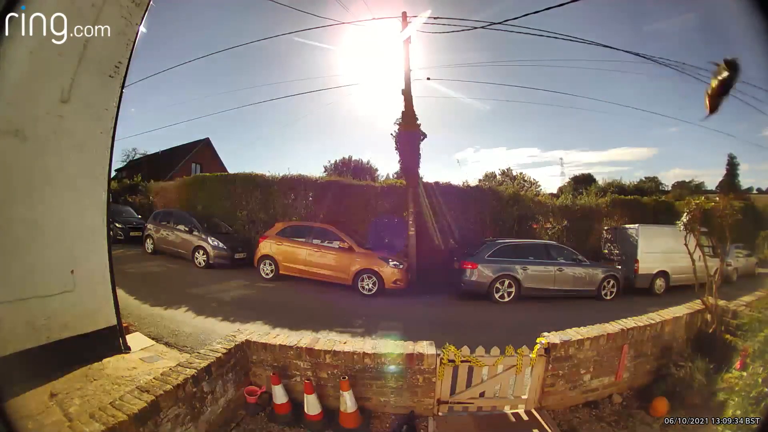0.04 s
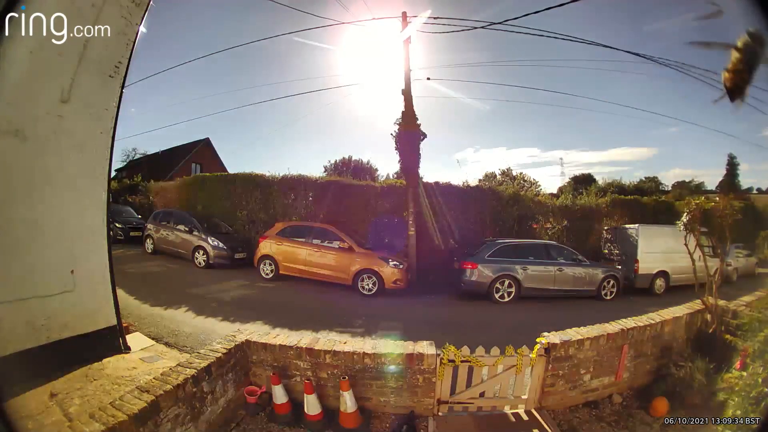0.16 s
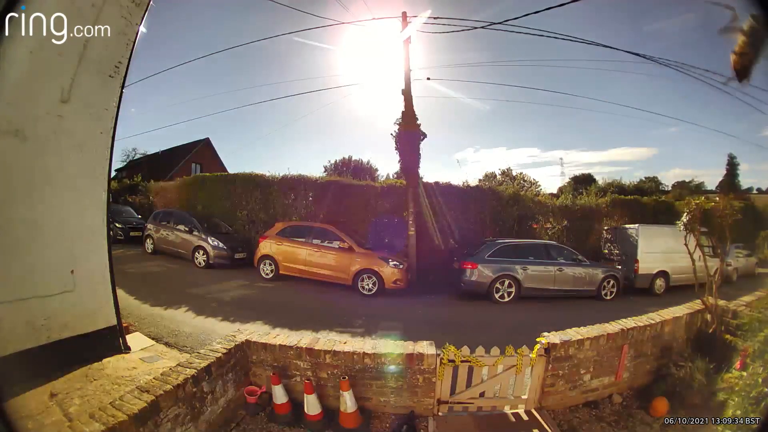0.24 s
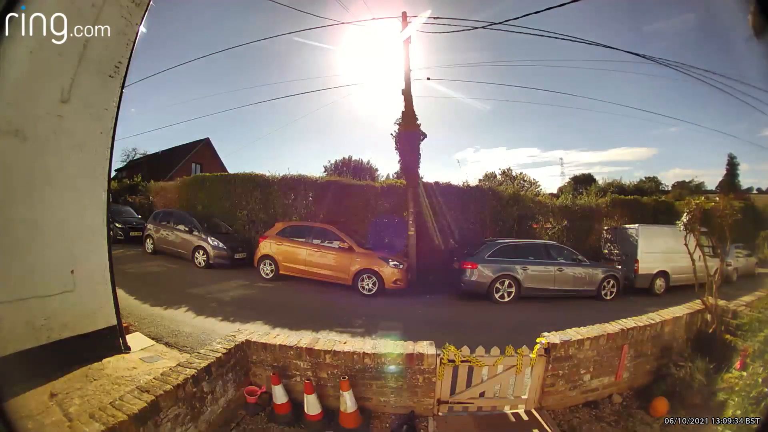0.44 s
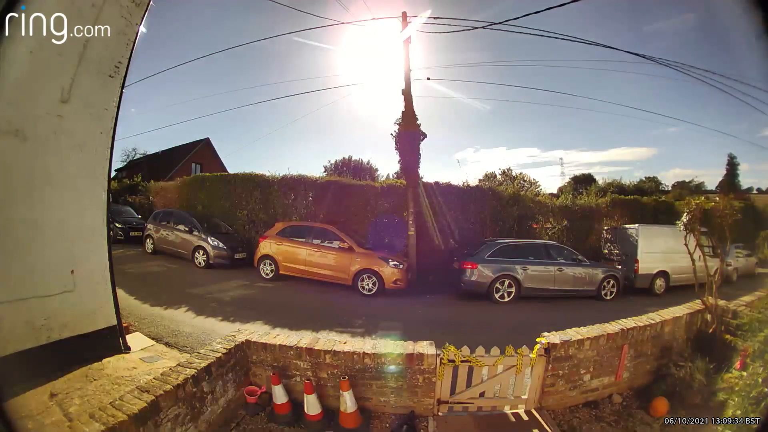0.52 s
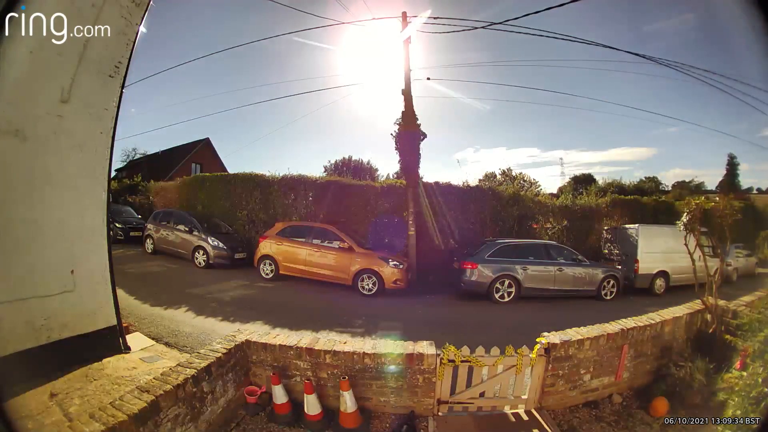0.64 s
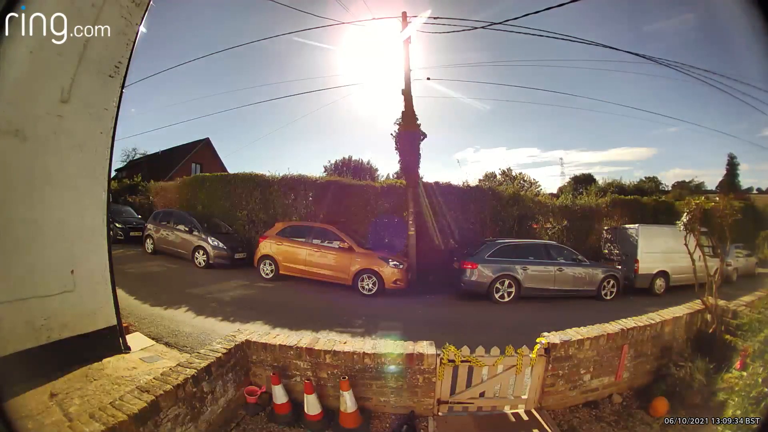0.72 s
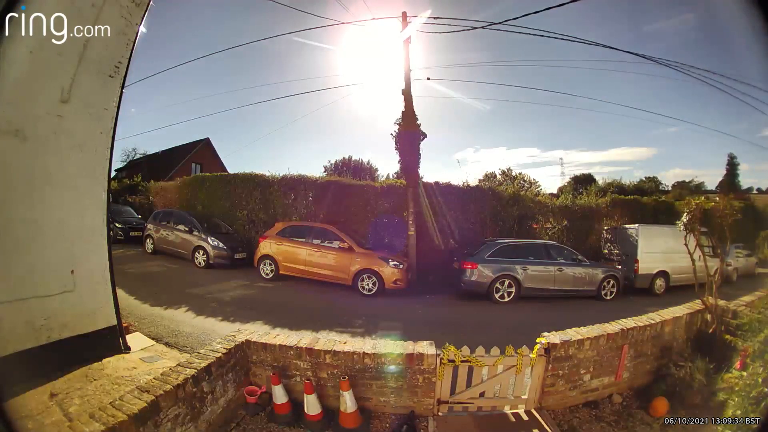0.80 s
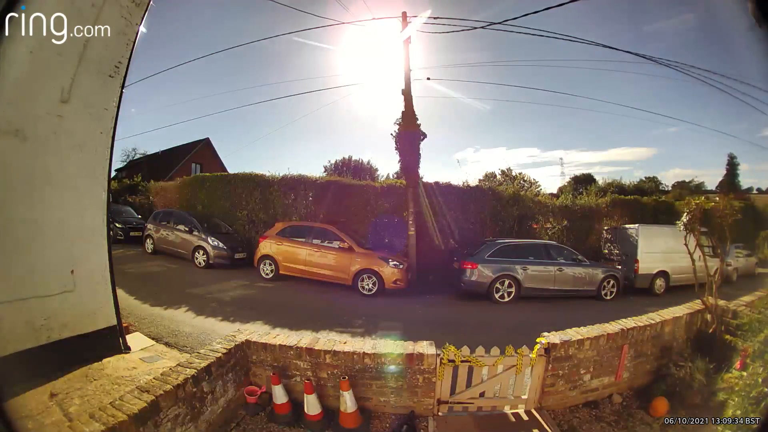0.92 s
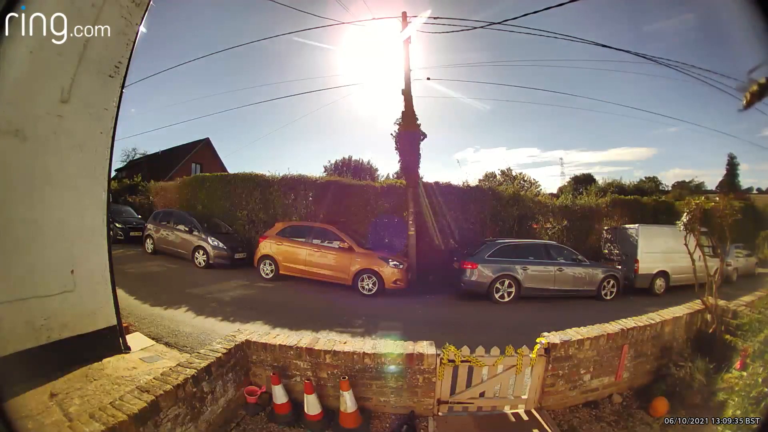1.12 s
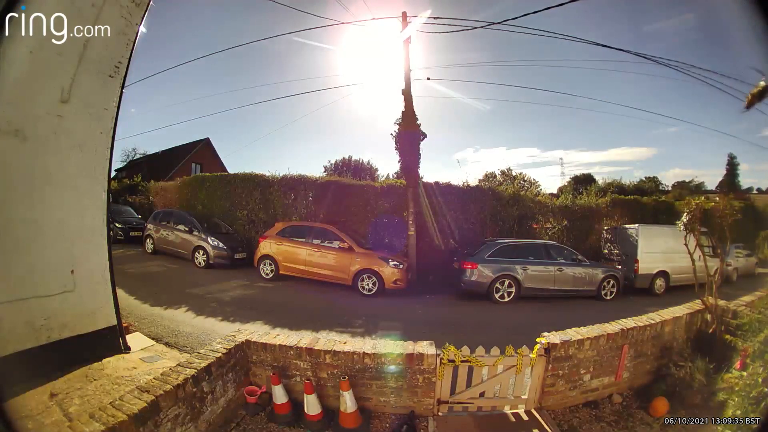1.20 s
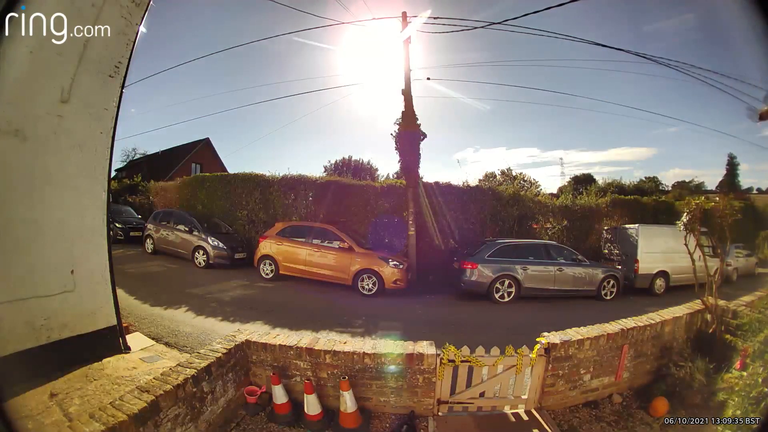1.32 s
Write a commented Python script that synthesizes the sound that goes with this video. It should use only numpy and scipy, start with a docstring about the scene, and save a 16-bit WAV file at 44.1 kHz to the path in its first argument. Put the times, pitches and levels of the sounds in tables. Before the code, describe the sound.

A bee hovers centimetres from the microphone in a front yard, with a low, wavering buzz. The closest passes bring small gusts and soft thumps on the microphone before the buzz weakens, with faint hiss behind.

```python
"""A bee hovers and darts a few centimetres from an outdoor camera's microphone on a house wall.
Its wingbeat gives a round hum and, on every beat, a raspy snap and a puff of air.
The wall throws the rasp straight back, and the yard adds a short scatter of the whole buzz.
On the closest passes the wing wash buffets the microphone, over a faint outdoor hiss."""
import sys
import numpy as np
from scipy import signal
from scipy.fft import rfft, irfft
from scipy.io import wavfile

SR = 44100
rng = np.random.default_rng(int(sys.argv[2]) if len(sys.argv) > 2 else 0)


def file_out(sig):
    """Save sig as 16-bit WAV at sys.argv[1]."""
    # one column per channel
    cols = np.atleast_2d(sig).T
    # limit, then scale
    lim = np.clip(cols, -1, 1)
    pcm = np.round(lim * 32767).astype(np.int16)
    wavfile.write(sys.argv[1], SR, pcm)


N = 59535
TIME = np.arange(N) / SR
JITTER_HZ, SWAY_HZ = 122, 46.3  # rates of the fast roughness and of the partials' slower level sway
HUM_OVER_RASP_DB = 16  # nominal lead of the hum over the rasp


def amp(db):
    """Decibels to gain."""
    return 10 ** (np.asarray(db) / 20)


def unit(x):
    """Scales to an rms of one."""
    return x / np.sqrt(np.mean(x ** 2) + 1e-20)


def gain_at(spectrum, hz):
    """Gain of a spectrum table at the given frequencies."""
    table_hz, db = np.transpose(spectrum)
    return amp(np.interp(np.log(hz + 1), np.log(table_hz + 1), db))


def colour(x, spectrum):
    """Filters a sound by a spectrum table."""
    return irfft(rfft(x, 2 * N) * gain_at(spectrum, np.fft.rfftfreq(2 * N, 1 / SR)))[:N]


def wander(rate_hz):
    """A smooth random curve of rms one that moves up to about the given rate."""
    hz = np.fft.rfftfreq(N, 1 / SR)
    return unit(irfft(rfft(rng.standard_normal(N)) * np.exp(-(hz / rate_hz) ** 2), N))


def bell(x, centre, width):
    """A Gaussian swell of height one."""
    return np.exp(-.5 * ((x - centre) / width) ** 2)


def outdoor_hiss():
    """The faint, steady background of the open air around the house."""
    # noise spectrum: f/Hz, relative level/dB
    spectrum = [(30, -17), (190, -7), (450, -0.5), (900, -3), (1700, -9.5), (2600, -15), (4000, -18),
                (6500, -21), (8000, -26)]
    return amp(-73) * unit(colour(rng.standard_normal(N), spectrum))


def yard_scatter(x, t60_s=0.24):
    """The walls around the yard return a faint, short tail, starting 6 ms after the direct sound."""
    t = TIME[:SR // 3]
    tail = rng.standard_normal(len(t)) * amp(-60 * t / t60_s) * (t > .006)
    return amp(-13) * signal.fftconvolve(x, tail / np.linalg.norm(tail))[:N]


def wall_reflection(x):
    """The house wall by the microphone gives one close reflection; its delay drifts as the bee moves."""
    delay_s = 0.001622 + .00025 * wander(rate_hz=6.8)
    return amp(-13.5) * np.interp(TIME - delay_s, TIME, x)


def wing_wash():
    """At closest range the wings blow low gusts onto the microphone, with a few hard eddies among them."""
    # gusts: t/s, half width/s, level/dB
    gusts = [(.251, .009, -44), (.278, .007, -51), (.32, .012, -58), (.368, .009, -49), (.399, .006, -52),
             (.468, .013, -59), (.568, .01, -52), (.66, .02, -63), (.735, .018, -61), (.775, .009, -59),
             (.825, .02, -71), (.912, .012, -56), (.96, .012, -68), (1.007, .01, -67), (1.077, .01, -62)]
    # their turbulence: f/Hz, relative level/dB
    turbulence = [(20, -24), (60, -9), (95, -3), (135, 0.5), (220, -9.5), (350, -8), (480, -16.5),
                  (650, -13), (1000, -27), (2000, -54)]
    # eddies that thud on the microphone: t/s, peak level/dB, f/Hz
    eddies = [(0.2526, -35.5, 303), (.2611, -20.5, 379), (0.2742, -29, 403), (.3485, -38, 484),
              (0.3604, -29.5, 367), (0.3798, -40, 318), (.3987, -32.5, 392), (0.5618, -39.5, 342),
              (.565, -37.5, 445)]
    force = sum(amp(db) * bell(TIME, at, width) for at, width, db in gusts)
    churn = colour(rng.standard_normal(N), turbulence)
    window = np.hanning(round(.04 * SR))
    local_rms = np.sqrt(signal.fftconvolve(churn ** 2, window / window.sum(), "same"))
    thuds = sum(amp(db) * bell(TIME, at, width=0.0016) * np.cos(2 * np.pi * hz * (TIME - at))
                for at, db, hz in eddies)
    return force * churn / local_rms - thuds


def back_stroke(cycles, beat_hz):
    """A second, less even snap between the main ones brightens the buzz as the bee turns."""
    # turns of the body: t/s, half width/s, level/dB, centre f/Hz
    body_turns = [(0.219, 0.012, -68.5, 1897), (0.327, 0.016, -67, 1670), (0.527, 0.016, -70.5, 1840),
                  (0.895, 0.043, -75, 2200), (1.054, 0.013, -59.5, 1800)]
    late_cycles = cycles - 0.3124 + 0.0033 * wander(JITTER_HZ)
    out = np.zeros(N)
    for at, width, db, hz in body_turns:
        snaps = sum(bell(k * beat_hz, hz, width=420) * np.cos(2 * np.pi * k * late_cycles)
                    for k in range(4, 14))
        out += amp(db) * bell(TIME, at, width) * unit(snaps)
    return out


def torn_air(cycles, hum_db, rasp_db):
    """The wings tear the air: noise that swells once a beat, mostly following the rasp's level."""
    # noise spectrum: f/Hz, relative level/dB
    spectrum = [(100, -19), (250, -7.5), (500, 7.5), (900, 3), (1900, -3.5), (2700, -9.5), (4000, -14),
                (6000, -16), (8000, -22)]
    puffs = np.exp(0.17 * np.cos(2 * np.pi * cycles))
    air = unit(colour(rng.standard_normal(N) * puffs, spectrum))
    air_db = rasp_db - 3.5 + 0.12 * (hum_db - rasp_db - HUM_OVER_RASP_DB)
    return amp(air_db) * air


def wing_snaps(cycles, beat_hz, rasp_db, flutter_db=1.5):
    """The turn of the wings gives one sharp snap a beat: upper partials in phase, no two snaps alike."""
    # snap spectrum: f/Hz, relative level/dB
    spectrum = [(700, -40), (930, 4), (1180, -2.5), (1430, 4), (1680, 0), (1950, -2.5), (2250, -9.5),
                (2800, -24), (4000, -37.5), (8000, -32.5)]
    snaps = np.zeros(N)
    for k in range(4, 34):
        flutter = amp(flutter_db * wander(SWAY_HZ))
        snaps -= gain_at(spectrum, k * beat_hz) * flutter * np.cos(2 * np.pi * k * cycles)
    roughness = 1 + 0.17 * wander(JITTER_HZ)
    return amp(rasp_db - 2) * unit(snaps * roughness)


def wing_hum(cycles, hum_db, third_db, rasp_db, sway_db=.3):
    """The three lowest partials: two strokes a beat make the second one the strongest."""
    fundamental_db = hum_db - 20.5 + 0.18 * (rasp_db + HUM_OVER_RASP_DB - hum_db)
    levels_db = (fundamental_db, hum_db + 1, third_db + 1)
    return -sum(amp(db + sway_db * wander(SWAY_HZ)) * np.cos(2 * np.pi * k * cycles)
                for k, db in enumerate(levels_db, 1))


def bee():
    """A few centimetres from the microphone, one wavering wingbeat drives both hum and rasp."""
    # the flight: t/s, wingbeat f/Hz, then base level/dB of the hum, the third partial and the rasp
    flight = [(0.0, 252, -43, -54, -61), (0.02, 242, -48, -52, -64), (0.067, 235.7, -67, -73, -70),
              (0.099, 237.5, -60, -68, -69), (0.169, 229.5, -57, -62, -63), (0.212, 243.9, -46, -60, -60),
              (0.245, 235.5, -43, -52, -61), (0.296, 225.1, -46, -53, -63),
              (0.33, 236.4, -40.5, -64, -62.5), (0.384, 240.8, -43, -54, -64),
              (0.42, 232.6, -49.5, -63, -67), (0.496, 226.7, -52.5, -62, -62),
              (0.54, 242.3, -48, -62, -60.5), (0.576, 232.2, -43, -53, -66), (0.61, 227.9, -56, -66, -64),
              (0.657, 236, -44.5, -59, -64.5), (0.682, 230.2, -51, -63, -66),
              (0.708, 243.1, -44.5, -60, -63.5), (0.752, 230, -53.5, -63, -64),
              (0.773, 239.1, -45, -63, -67), (0.8, 232.7, -51, -61, -67), (0.83, 244.7, -45.5, -63, -64),
              (0.86, 244.8, -49.5, -58, -60.5), (0.887, 232.8, -54.5, -64, -61.5),
              (0.916, 241.1, -40.5, -57, -62), (0.966, 240, -51.5, -60, -63.5),
              (0.993, 231.5, -61, -68, -69), (1.007, 238.5, -47, -59, -66),
              (1.05, 246.6, -48.5, -63, -64.5), (1.081, 243, -48, -64, -62.5),
              (1.103, 237.5, -63.5, -73, -72.5), (1.141, 244.3, -61.5, -70, -70.5),
              (1.211, 245.9, -68, -71, -69.5), (1.306, 245.2, -76.5, -83, -79.5),
              (1.35, 240.7, -64, -73, -69.5)]
    times, *columns = np.transpose(flight)
    beat_hz, hum_db, third_db, rasp_db = (np.interp(TIME, times, column) for column in columns)
    cycles = np.cumsum(beat_hz * (1 + .011 * wander(JITTER_HZ))) / SR
    rasp = wing_snaps(cycles, beat_hz, rasp_db) + torn_air(cycles, hum_db, rasp_db)
    rasp += back_stroke(cycles, beat_hz)
    hum = wing_hum(cycles, hum_db, third_db, rasp_db)
    return hum + rasp + wall_reflection(rasp) + yard_scatter(rasp + amp(-8) * hum)


def scene():
    """At the microphone, in mono: outdoor hiss behind, the bee and its wash up close."""
    return (outdoor_hiss() + bee() + wing_wash())[None]


def record(dry, fade_s=.003, cutoff_hz=8100):
    """Soft ends, then the camera's band limit."""
    to_nearest_end_s = np.minimum(TIME, TIME[::-1])
    fade = np.sin(np.pi / 2 * np.minimum(to_nearest_end_s / fade_s, 1)) ** 2
    lowpass = signal.firwin(901, cutoff_hz, window=("kaiser", 8), fs=SR)
    return signal.oaconvolve(dry * fade, lowpass[None], "same")


dry = scene()
out = record(dry)
file_out(out)
```